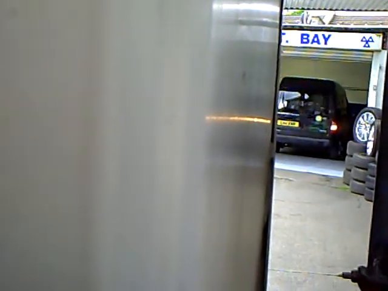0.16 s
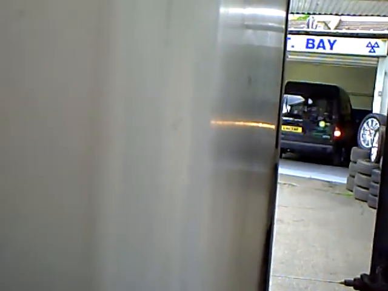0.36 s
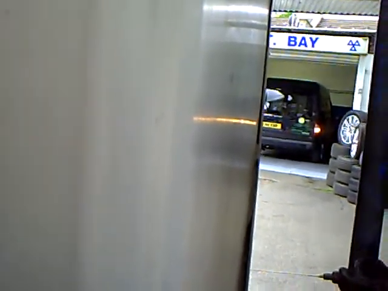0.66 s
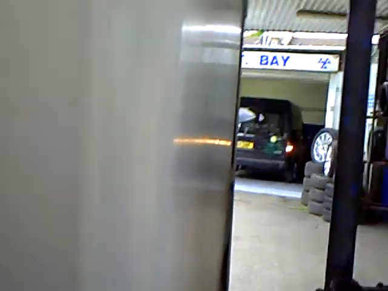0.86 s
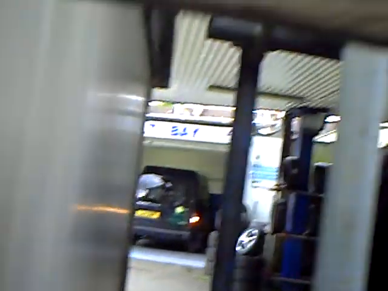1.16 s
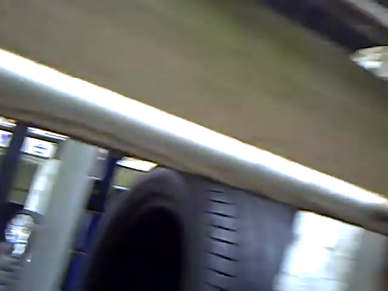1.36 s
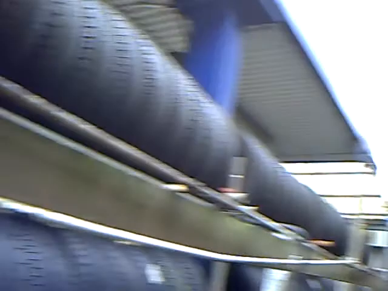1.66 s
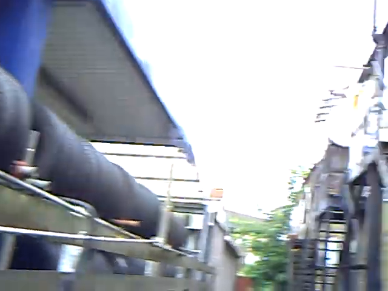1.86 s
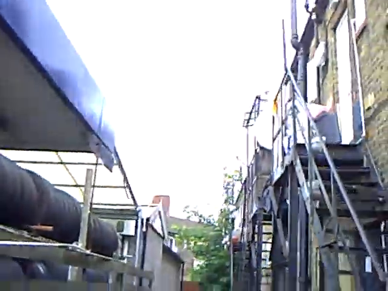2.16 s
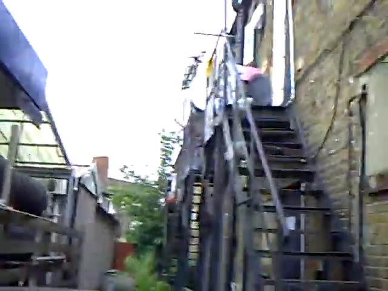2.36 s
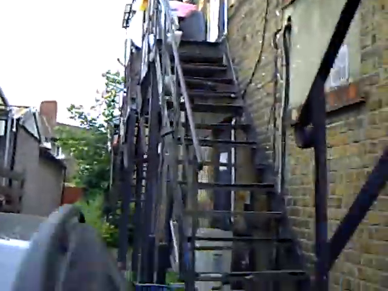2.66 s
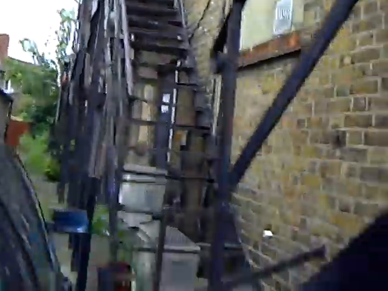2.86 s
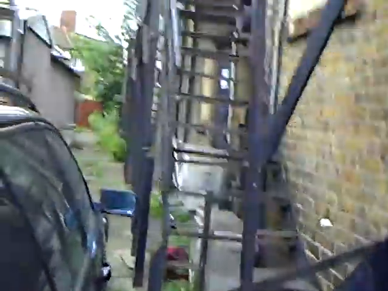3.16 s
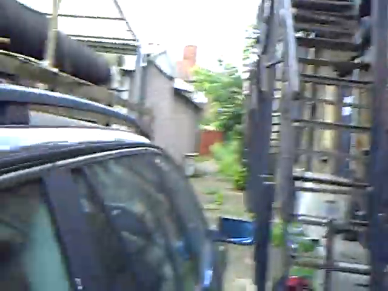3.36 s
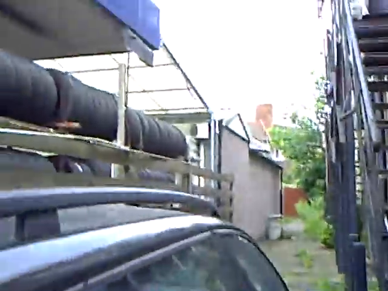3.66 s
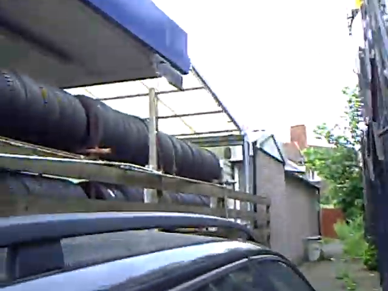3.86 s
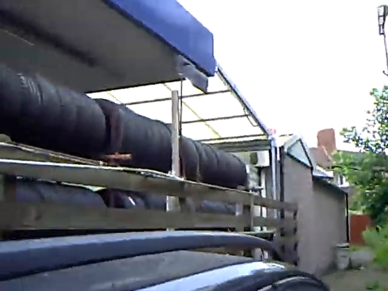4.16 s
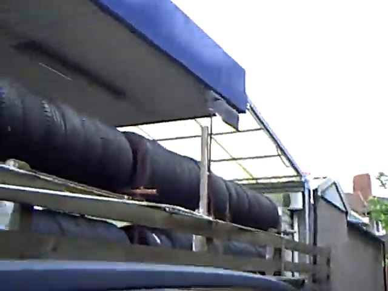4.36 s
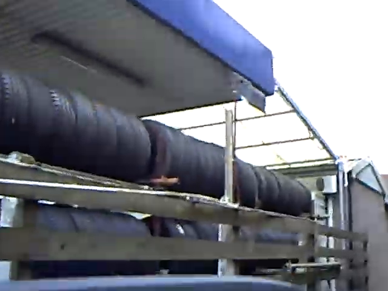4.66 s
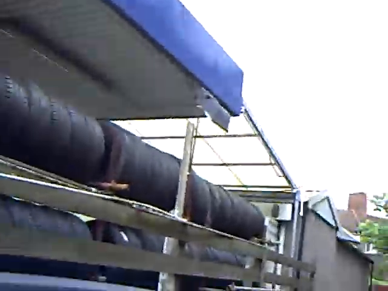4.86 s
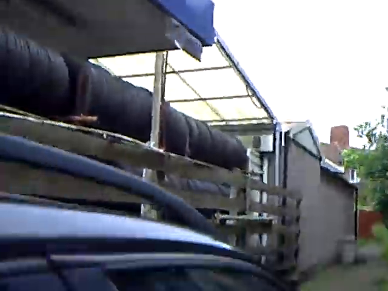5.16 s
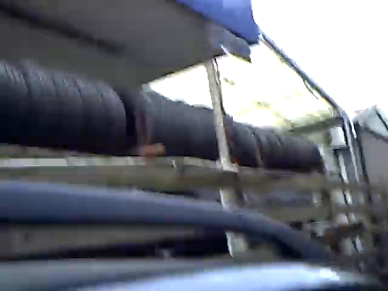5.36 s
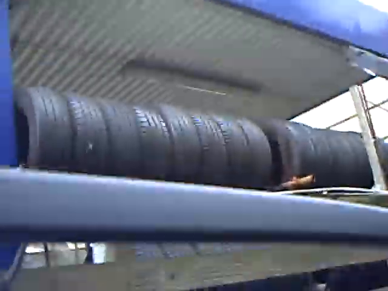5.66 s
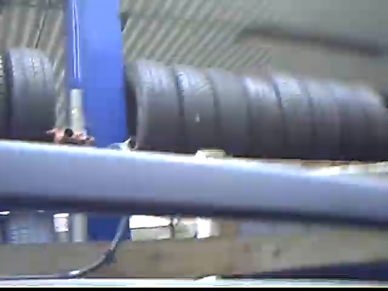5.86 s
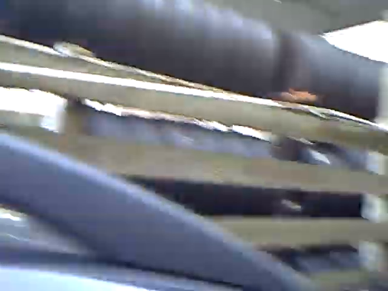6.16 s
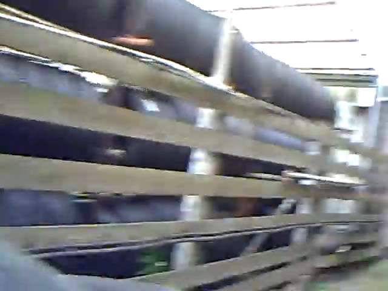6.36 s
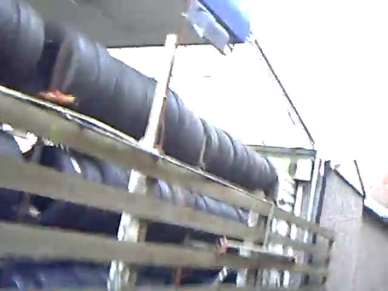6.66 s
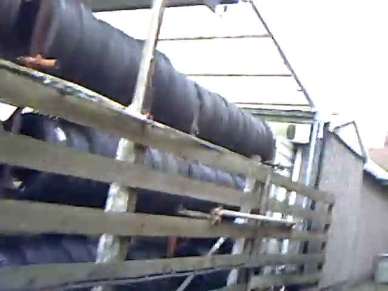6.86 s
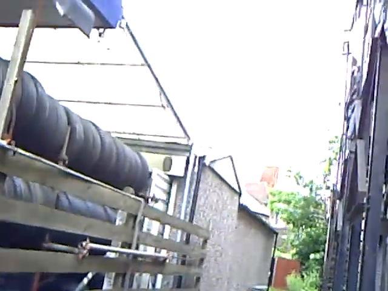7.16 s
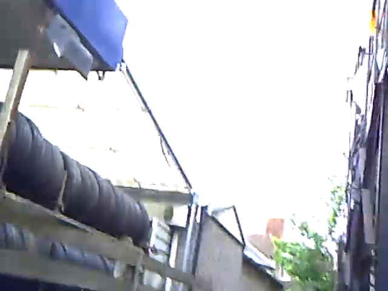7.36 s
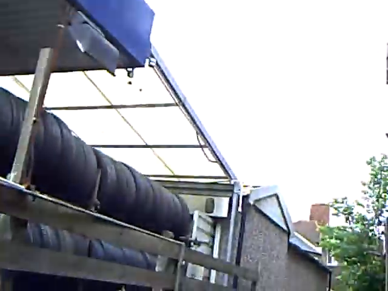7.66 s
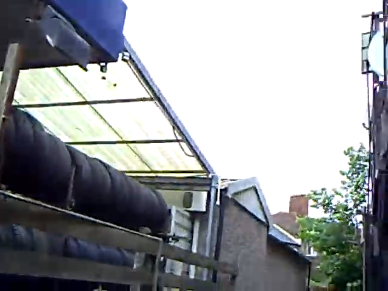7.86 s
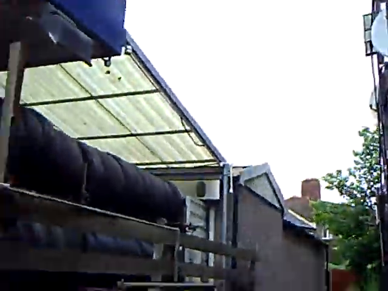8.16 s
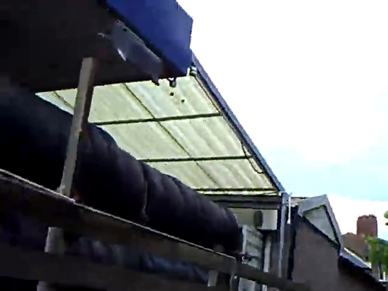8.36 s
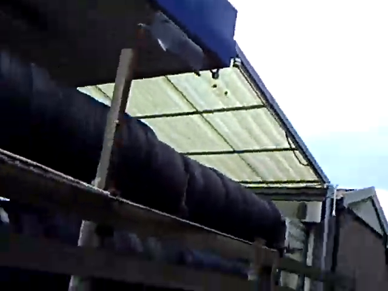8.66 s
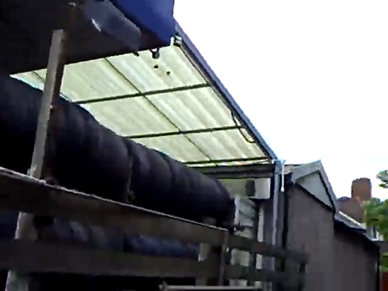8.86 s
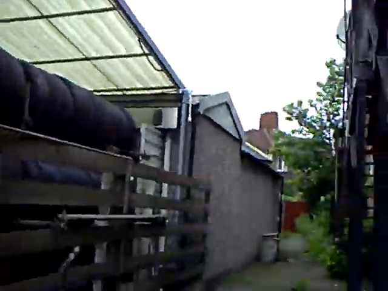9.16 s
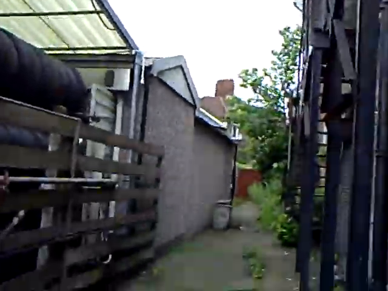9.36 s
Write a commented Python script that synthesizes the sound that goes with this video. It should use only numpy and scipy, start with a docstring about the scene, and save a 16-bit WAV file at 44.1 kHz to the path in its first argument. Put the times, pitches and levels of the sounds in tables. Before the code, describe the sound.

A moving handheld microphone, mono and slightly muffled at the top, passes a droning compressor outdoors. A strong low tone dominates, with wavering whine and rushing air; it crests early, the casing resonating, while buffets, clicks and foot scuffs interrupt. Afterwards hum, whine and hiss fall back. A short scrape, a weak rising whine, a soft gust, dull knocks and a breathy mechanical whirr close it.

```python
"""An air compressor drones beside a garage yard as the microphone is carried past it.
From the start: a pulsed low hum with faint overtones, a fluttering three-partial fan whine, air noise, a scuff.
Near 3 s the casing resonances ring louder and the hum crests; gusts, scuffs and clicks follow.
Past 6 s hum, whine and hiss sink; near 7 s a scuff, a metal scrape, then a faint climbing tone.
Toward the end the hiss partly returns, with a gust, two dull bumps and a whirr."""
import sys
import numpy as np
from scipy import signal
from scipy.fft import rfft, irfft
from scipy.io import wavfile

SR = 44100
rng = np.random.default_rng(int(sys.argv[2]) if len(sys.argv) > 2 else 0)


def store_wav(level_fs):
    """Save 16-bit WAV to argv[1]."""
    pcm = np.round(np.clip(np.atleast_2d(level_fs), -1, 1) * 32767)
    wavfile.write(sys.argv[1], SR, pcm.T.astype(np.int16))


N = 418950
T = np.arange(N) / SR  # s

# Bell lengths run from the centre to 1/e, unless stated otherwise.
# Compressor pulses. Each row: time in seconds, rate in Hz.
PULSE_RATE_HZ = [(0, 83.5), (1.2, 83.2), (3.7, 84.6), (5.2, 83.3), (6.3, 82.8), (7.5, 81.7), (9.5, 81)]
# Hum overtones. Each row: multiple of the pulse rate, level in dB before the swell.
HUM_OVERTONES_DB = [(2, -47), (3, -48), (4, -54.5), (5, -59.5)]
# Hum standing waves crossed. Each row: centre in seconds, length in seconds, gain in dB.
HUM_STANDING_WAVES_DB = [(2.3, 0.25, -0.5), (3.35, 0.26, 1.5), (4.6, 0.19, 1.5), (5.9, 0.25, -5),
                         (6.9, 0.39, -3), (8.8, 0.42, -7)]
# Fan blades. Each row: time in seconds, blade rate in Hz.
BLADE_RATE_HZ = [(0, 555.5), (5.2, 556.6), (6.7, 553.2), (8, 557), (9.5, 550)]
# Whine between crests, before the partials' offsets and shares. Each row: time in seconds, level in dB.
WHINE_DB = [(0, -43), (2.6, -40), (5.7, -39.5), (6.2, -47.5), (9.5, -51)]
# Whine partials, first upward. Each row: offset in dB, share of the level's swing.
FAN_PARTIALS = [(-2, 0.91), (-9, 0.34), (-11.5, .3)]
# Whine standing-wave peaks. Each row: centre in seconds, length in seconds, partial number, gain in dB.
FAN_CRESTS = [(1.043, 0.23, 1, 11.5), (1.65, .13, 1, 10.5), (3.653, 0.75, 1, 7.5), (4.74, 0.34, 1, 8),
              (5.32, 0.19, 1, 10.5), (9.45, .15, 1, 12), (1.72, 0.087, 2, 9), (4.74, 0.6, 2, 6),
              (5.95, 0.44, 2, 9.5), (4.8, .6, 3, 4.5), (7.75, 0.079, 3, 10), (9.148, 0.38, 3, 7.5)]
# Casing resonances. Each row: centre in Hz, width in Hz before widening, level in dB before the casing curve.
CASING_MODES = [(252.8, 18, -44.5), (291, 14.3, -42), (459, 5.4, -50.5), (505.3, 29, -49.5), (703, 50, -59),
                (1606, 125, -56.5), (2250, 190, -55.5)]
# Casing gain curve. Each row: time in seconds, gain in dB.
CASING_GAIN_DB = [(0, -7.5), (2.3, -7), (2.7, 4.5), (5.5, 3), (6.9, -0.5), (7.8, 2.5), (9.5, 4)]
# Brief casing swells. Each row: centre in seconds, length in seconds, pitch in Hz, level in dB.
CASING_SWELLS = [(.58, 0.17, 527, -37), (2.0, 0.49, 166, -42), (2.101, .2, 461, -41),
                 (2.618, .2, 245.4, -37.5), (2.68, .22, 463, -40), (3.15, .2, 250, -38),
                 (5.199, 0.25, 458, -39.5), (5.251, 0.2, 250, -35.5), (5.351, .22, 292, -39.5),
                 (6.149, .2, 251, -40.5), (7.9, .6, 291, -41.5), (8.05, 0.428, 166, -42),
                 (9.3, 0.24, 452.4, -41.5), (9.302, .3, 289, -41)]
# Dull rush, before RUSH_GAIN_DB. Each row: time in seconds, level in dB.
RUSH_CURVE_DB = [(0.0, -44.5), (0.87, -44), (2.14, -38.5), (4.05, -41), (4.6, -39), (4.71, -40.5),
                 (5.87, -41.5), (6.27, -45), (9.31, -41.5), (9.5, -42.5)]
# Bright hiss, before HISS_GAIN_DB. Each row: time in seconds, level in dB.
HISS_CURVE_DB = [(0.0, -44.5), (0.18, -43), (0.58, -41.5), (1.48, -40.5), (3.07, -44.5), (4.37, -45.5),
                 (6.43, -56), (7.22, -57), (7.62, -55.5), (7.88, -52), (9.07, -49), (9.5, -50)]
# Relative spectra of rush, hiss, buffets and scuffs. Each row: frequency in Hz, density in dB per Hz.
RUSH_SPECTRUM = [(40, 14.5), (150, 8), (300, -1.5), (450, 4), (620, 3), (950, 1), (1250, -4), (1650, -5.5),
                 (2300, -19), (3500, -17), (6000, -42)]
HISS_SPECTRUM = [(500, 3), (1100, 5.5), (1650, 10.5), (2300, 7.5), (3100, 4.5), (3700, -2.5), (4600, 0.5),
                 (5800, 1), (7000, -2), (7800, 2.5), (8900, 0), (10000, -5.5), (11200, -11.5)]
BUFFET_SPECTRUM = [(12, 0.5), (25, -1.5), (50, 5), (75, -3.5), (120, -6), (180, -8.5), (260, -13),
                   (500, -17.5), (1200, -60)]
SCUFF_SPECTRUM = [(500, -4), (1700, 3), (2350, 0.5), (3000, -8), (4000, -12), (6500, -15.5), (7700, -12),
                  (9000, -14), (10500, -31)]
# Whirring bands. Each row: centre in seconds, length in seconds, centre in Hz, width in Hz, level in dB.
WHIRR_BANDS = [(.5, .3, 2074, 70, -46), (1.05, .25, 1690, 90, -46), (1.6, .35, 1500, 200, -45),
               (2.25, 0.27, 798, 60, -44), (3.45, .2, 1420, 70, -43), (9.1, 0.44, 1500, 300, -48)]
# Gusts on the microphone. Each row: centre in seconds, length in seconds, gain in dB.
GUST_GAINS = [(3.5, .3, 10), (4.3, 0.35, 9), (4.62, 0.095, 10.5), (5.8, .45, 4), (7.75, .2, 4.5),
              (8.75, 0.42, 3.5)]
# Shoe scuffs. Each row: centre in seconds, level in dB, length in seconds to 1/e^2.
SHOE_SCUFFS = [(1.123, -38.5, 0.2), (3.6, -39.5, 0.07), (4.32, -35.5, 0.054), (5.105, -37, 0.066),
               (5.5, -45, .025), (5.85, -47, 0.017), (6.232, -46, 0.021), (6.979, -41, 0.023),
               (7.748, -46, 0.072)]
# Scrape resonances. Each row: centre in Hz, width in Hz, level in dB.
SCRAPE_MODES = [(2200, 57, -42), (2410, 300, -38.5), (2570, 55, -44), (3360, 80, -51), (7440, 200, -52)]
# Handling clicks and bumps. Each row: start in seconds, peak in dB, pitch in Hz, contact decay in seconds.
HANDLING_CLICKS = [(3.19, -29, 7794, .002), (4.376, -21, 425, 0.0036), (4.62, -16.5, 402, .002),
                   (5.283, -27.5, 7800, 0.0018), (5.2865, -26, 7850, .001), (5.4465, -24.5, 7700, .0015),
                   (5.452, -28, 3000, 0.0016), (5.58, -25.5, 2200, 0.00081), (5.842, -24, 1690, 0.0046),
                   (8.765, -19, 132, 0.017), (9.071, -24, 290, .02)]

# Walk: closest approach, time to cover that distance again, loss per doubling of distance.
CLOSEST_S, PASSING_S, FALL_DB = 3.7, 1.0, 9
HUM_DB = -11  # at the closest point, before standing waves and flutter
CASING_WAVER_DB, CASING_WAVER_HZ, CASING_WIDENING = 1.2, 1.55, 1.6
SCREENED_ABOVE_HZ, SCREENED_SHARE = 1200, 0.3  # high resonances follow this share of the hiss swing in dB
CLIMB_START_S, CLIMB_FADE_S, CLIMB_HZ, CLIMB_HZ_PER_S = 7.1, 0.26, 678, 22
CLIMB_DB, CLIMB_DB_PER_S = -51.5, 1.7
RUSH_GAIN_DB, HISS_GAIN_DB = 7, 5.5
BUFFET_DB = -33  # before gusts, lull and flutter
LULL_S, LULL_LENGTH_S, LULL_DB = 7.15, 0.4, -6
SCRAPE_S, SCRAPE_LENGTH_S = 6.979, 0.018  # length to 1/e^2
CUTOFF_HZ = 11100


def from_db(db):
    """Decibels to amplitude gain."""
    return 10 ** (np.asarray(db) / 20)


def rms_one(x):
    """Scale to unit rms."""
    return x / np.sqrt(np.mean(x ** 2) + 1e-20)


def curve(rows):
    """Interpolate a (seconds, value) table at every sample."""
    s, value = np.transpose(rows)
    return np.interp(T, s, value)


def bell(centre_s, length_s):
    """Gaussian in time, 1 at its centre."""
    return np.exp(-((T - centre_s) / length_s) ** 2)


def bumps(rows):
    """Sum of bell-shaped rises and dips, in dB."""
    return sum(db * bell(s, length_s) for s, length_s, db in rows)


def drift(rate_hz):
    """Random wander of rms 1: noise through two equal low-pass poles, computed at SR / 40."""
    step = 40
    r = np.exp(-2 * np.pi * rate_hz * step / SR)
    settle = 2000
    white = rng.standard_normal(N // step + settle + 2)
    slow = signal.lfilter([1], [1, -2 * r, r * r], white)[settle:]
    return np.interp(np.arange(N) / step, np.arange(len(slow)), rms_one(slow))


def noise(spectrum):
    """Noise of rms 1, its spectrum interpolated over log frequency."""
    hz, db = np.transpose(spectrum)
    bins_hz = np.maximum(np.arange(N // 2 + 1) * SR / N, 1)
    gain = from_db(np.interp(np.log(bins_hz), np.log(hz), db))
    gain *= np.minimum(bins_hz / hz[0], 1)  # falls below the first point
    return rms_one(irfft(rfft(rng.standard_normal(N)) * gain, N))


def resonate(x, hz, width_hz):
    """Two-pole resonance, applied twice for steep skirts."""
    r = np.exp(-np.pi * width_hz / SR)
    section = [1 - r, 0, r - 1, 1, -2 * r * np.cos(2 * np.pi * hz / SR), r * r]
    return signal.sosfilt([section, section], x)


def partial(hz, flutter_db, flutter_hz):
    """Sine of rms 1 before its random level flutter."""
    phase = 2 * np.pi * (np.cumsum(hz) / SR + rng.random())
    return np.sqrt(2) * np.sin(phase) * from_db(flutter_db * drift(flutter_hz))


def hum():
    """Pulsing air gives one strong low tone that falls with distance; its faint overtones swell less."""
    hz = curve(PULSE_RATE_HZ) * (1 + 0.0019 * drift(4.3))
    distance = np.hypot(1, (T - CLOSEST_S) / PASSING_S)  # closest = 1
    level_db = HUM_DB - FALL_DB * np.log2(distance) + bumps(HUM_STANDING_WAVES_DB)
    out = from_db(level_db) * partial(hz, flutter_db=0.96, flutter_hz=14)
    swell = from_db(0.35 * (level_db - level_db.mean()))
    for multiple, db in HUM_OVERTONES_DB:
        out += swell * from_db(db) * partial(multiple * hz, flutter_db=1.5, flutter_hz=3.2)
    return out


def fan():
    """Three blade-rate partials, unsteady in turbulent air, each with its own standing waves."""
    hz = curve(BLADE_RATE_HZ) * (1 + 0.0023 * drift(16.5))
    level_db = curve(WHINE_DB)
    mean_db = level_db.mean()
    out = np.zeros(N)
    for k, (offset_db, share) in enumerate(FAN_PARTIALS, 1):
        crests = [(s, length_s, db) for s, length_s, which, db in FAN_CRESTS if round(which) == k]
        partial_db = mean_db + offset_db + share * (level_db - mean_db) + bumps(crests)
        out += from_db(partial_db) * partial(k * hz, flutter_db=1.73, flutter_hz=13.6)
    return out


def casing():
    """Random vibration rings the panels, each wavering by itself; high rings are screened with the hiss."""
    shake = rng.standard_normal(N)
    hiss_db = curve(HISS_CURVE_DB)
    screen_db = SCREENED_SHARE * (hiss_db - hiss_db.mean())
    rings = np.zeros(N)
    for hz, width_hz, db in CASING_MODES:
        level_db = db + CASING_WAVER_DB * drift(CASING_WAVER_HZ)
        if hz > SCREENED_ABOVE_HZ:
            level_db = level_db + screen_db
        rings += from_db(level_db) * rms_one(resonate(shake, hz, width_hz * CASING_WIDENING))
    return from_db(curve(CASING_GAIN_DB)) * rings


def casing_swells():
    """Casing resonances swell for a moment, each drawn as one wavering sine."""
    out, wander = np.zeros(N), drift(8.8)
    for s, length_s, hz, db in CASING_SWELLS:
        heard = np.abs(T - s) < 2 * length_s
        offset_s = T[heard] - s
        tone_wander = np.roll(wander, rng.integers(N))[:len(offset_s)]
        pitch_hz = hz * (1 + 0.0043 * tone_wander)
        tone = np.sqrt(2) * np.sin(2 * np.pi * np.cumsum(pitch_hz) / SR)
        out[heard] += from_db(db) * np.exp(-(offset_s / length_s) ** 2) * tone
    return out


def climbing_whine():
    """A faint unsteady sine fades in, its mean pitch and level rising steadily."""
    age_s = np.maximum(T - CLIMB_START_S, 0)
    hz = (CLIMB_HZ + CLIMB_HZ_PER_S * age_s) * (1 + 0.0122 * drift(26.8))
    fade = np.minimum(age_s / CLIMB_FADE_S, 1)
    gain = fade * from_db(CLIMB_DB + CLIMB_DB_PER_S * age_s)
    return gain * partial(hz, flutter_db=3.5, flutter_hz=14)


def air():
    """Dull rush and bright hiss: two shaped noises on separate level curves, the hiss more easily screened."""
    rush_db = curve(RUSH_CURVE_DB) + RUSH_GAIN_DB + 0.7 * drift(7.5)
    hiss_db = curve(HISS_CURVE_DB) + HISS_GAIN_DB + 0.5 * drift(24)
    return from_db(rush_db) * noise(RUSH_SPECTRUM) + from_db(hiss_db) * noise(HISS_SPECTRUM)


def whirrs():
    """Narrow bands of rushing air, resonances of one noise, stand out in passing."""
    flow, out = rng.standard_normal(N), np.zeros(N)
    for s, length_s, hz, width_hz, db in WHIRR_BANDS:
        out += from_db(db) * bell(s, length_s) * rms_one(resonate(flow, hz, width_hz))
    return out


def buffets():
    """Lumpy low noise of air on the moving microphone, with gusts and one lull."""
    level_db = BUFFET_DB + bumps(GUST_GAINS) + bumps([(LULL_S, LULL_LENGTH_S, LULL_DB)])
    return from_db(level_db + 1.1 * drift(16)) * noise(BUFFET_SPECTRUM)


def scuffs():
    """Soles drag over gritty concrete: short bells of fluttering shaped noise."""
    pressure = sum(from_db(db) * bell(s, length_s) ** 2 for s, db, length_s in SHOE_SCUFFS)
    return pressure * noise(SCUFF_SPECTRUM) * from_db(2.3 * drift(150))


def scrape():
    """Brief friction noise rings a few resonances of a metal part."""
    friction = rng.standard_normal(N)
    rings = sum(from_db(db) * rms_one(resonate(friction, hz, width_hz)) for hz, width_hz, db in SCRAPE_MODES)
    return rings * bell(SCRAPE_S, SCRAPE_LENGTH_S) ** 2


def clicks():
    """Each touch on the housing is a sharp push plus decaying noise through a heavily damped resonance."""
    out, age_s = np.zeros(N), T[:SR // 5]
    for s, peak_db, hz, decay_s in HANDLING_CLICKS:
        contact = rng.standard_normal(len(age_s)) * np.exp(-age_s / decay_s)
        contact[0] += 7.0  # push
        burst = resonate(contact, hz, min(hz * 0.51, 2100))
        start = int(s * SR)
        out[start:start + len(age_s)] += from_db(peak_db) * burst / np.abs(burst).max()
    return out


def scene():
    """Sum the machine and the walk on one channel."""
    machine = hum() + fan() + casing() + casing_swells() + climbing_whine() + air() + whirrs()
    walk = buffets() + scuffs() + scrape() + clicks()
    return (machine + walk)[None]


def record(dry):
    """A steep elliptic low-pass cuts the top."""
    return signal.sosfilt(signal.ellip(12, 0.2, 90, CUTOFF_HZ, fs=SR, output="sos"), dry)


dry = scene()
out = record(dry)
store_wav(out)
```